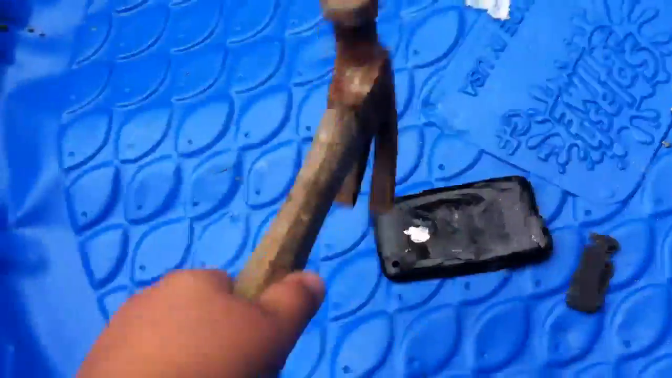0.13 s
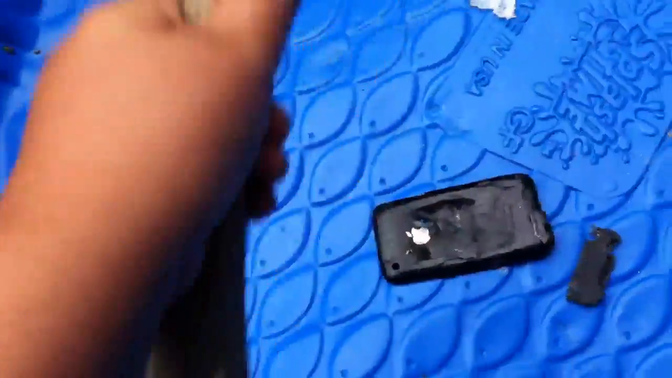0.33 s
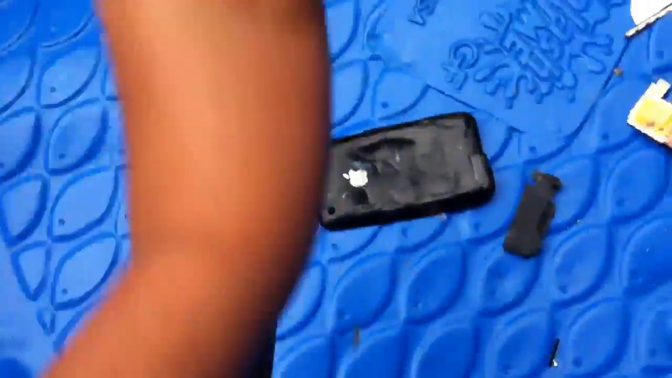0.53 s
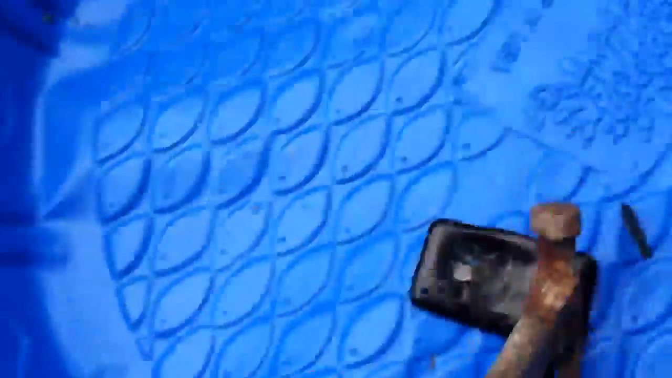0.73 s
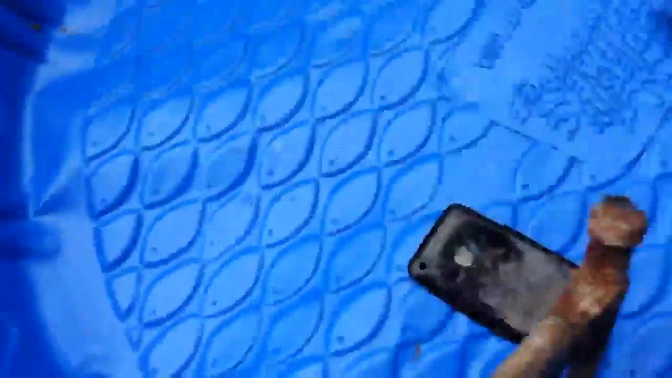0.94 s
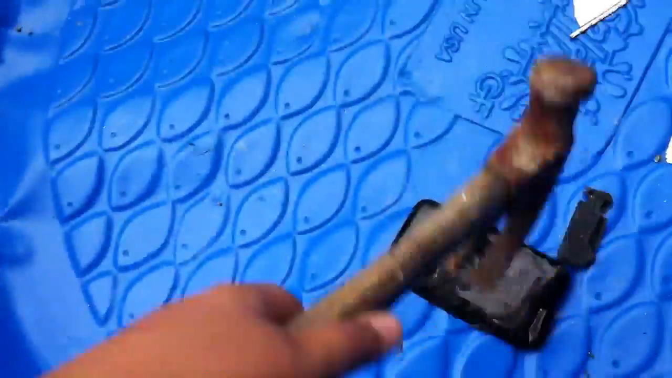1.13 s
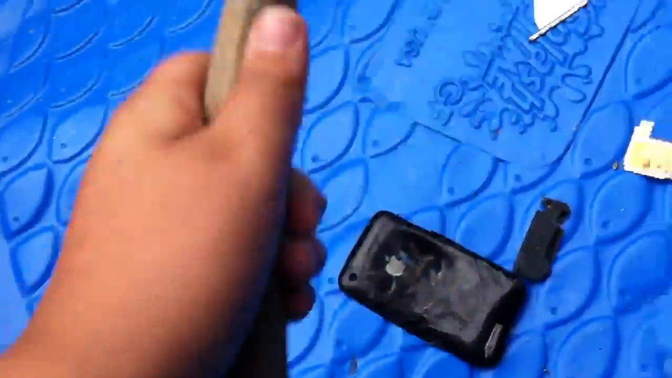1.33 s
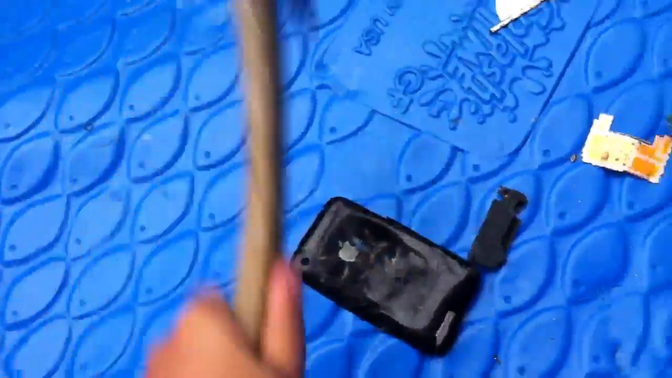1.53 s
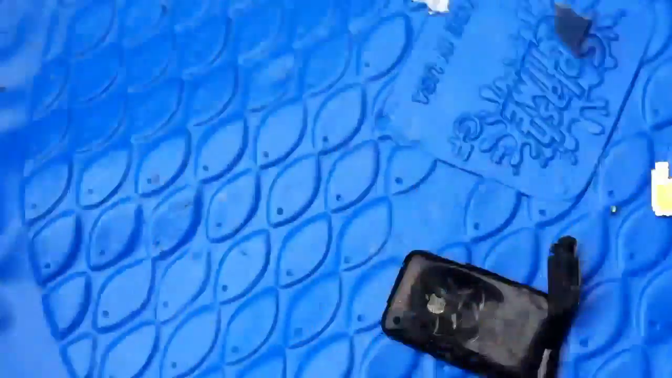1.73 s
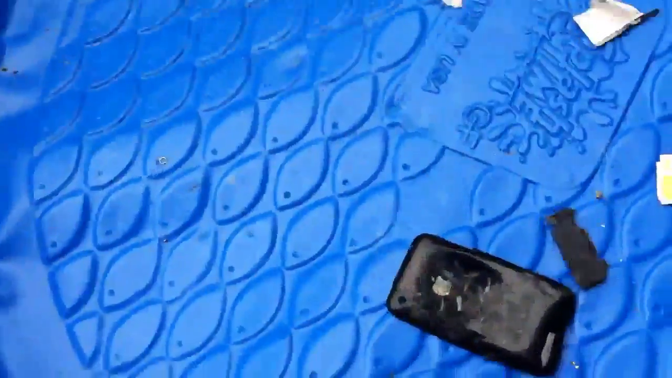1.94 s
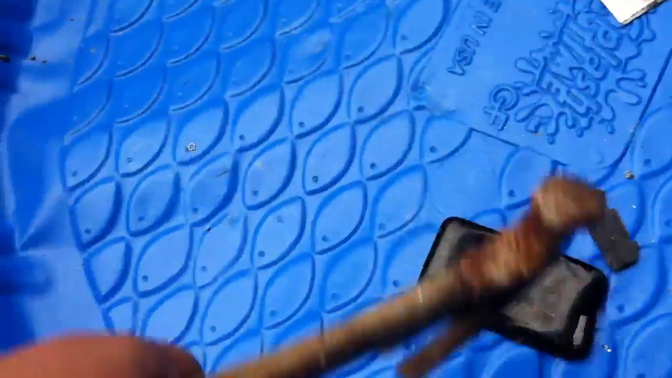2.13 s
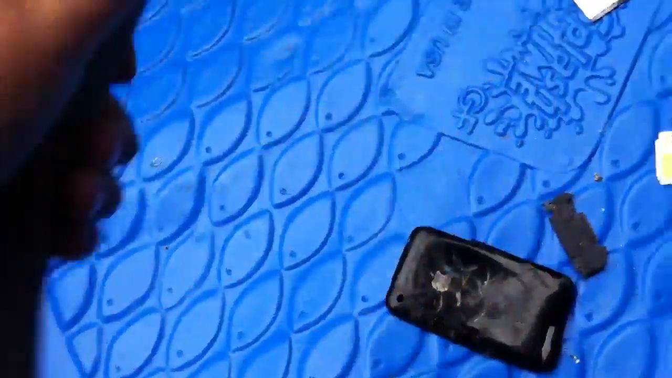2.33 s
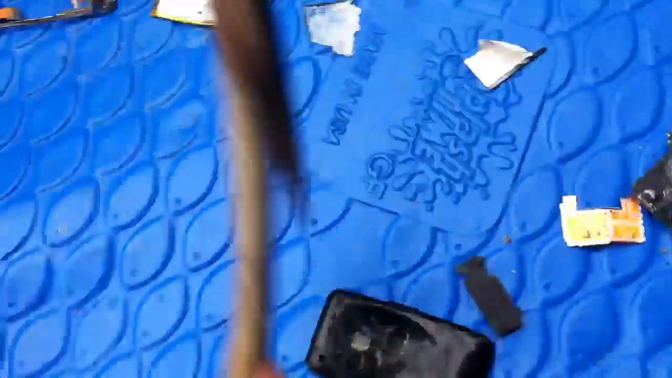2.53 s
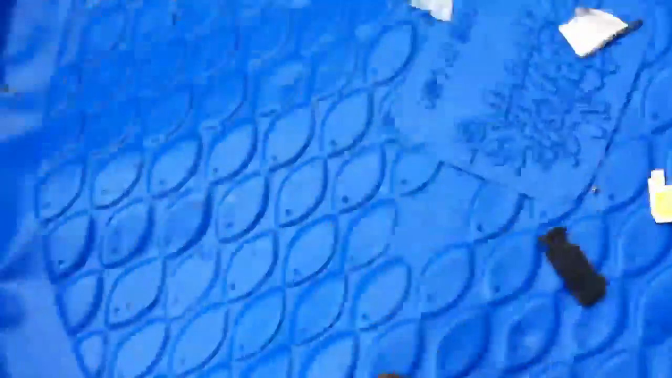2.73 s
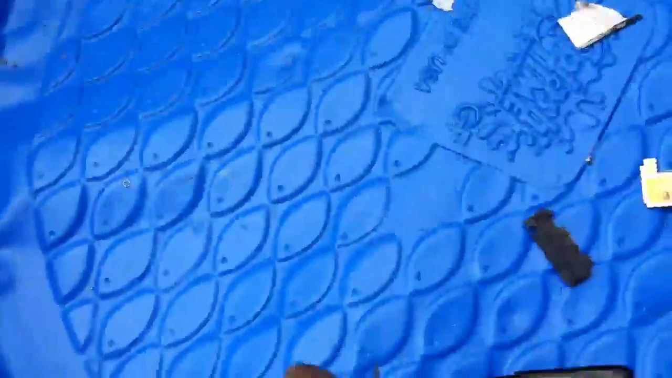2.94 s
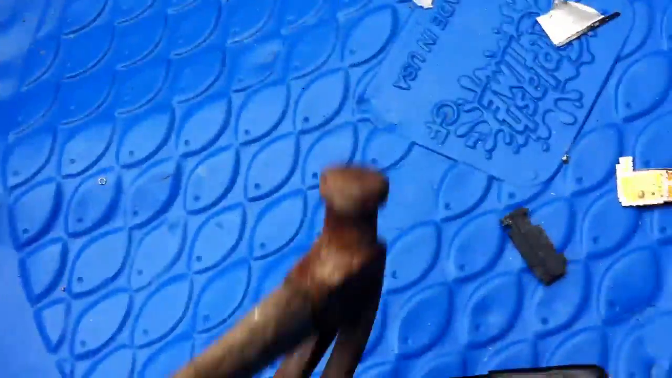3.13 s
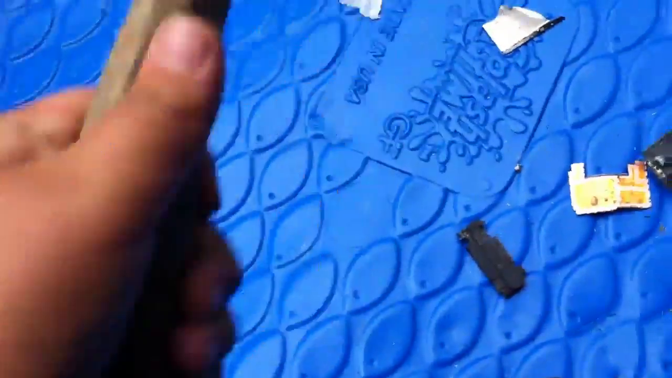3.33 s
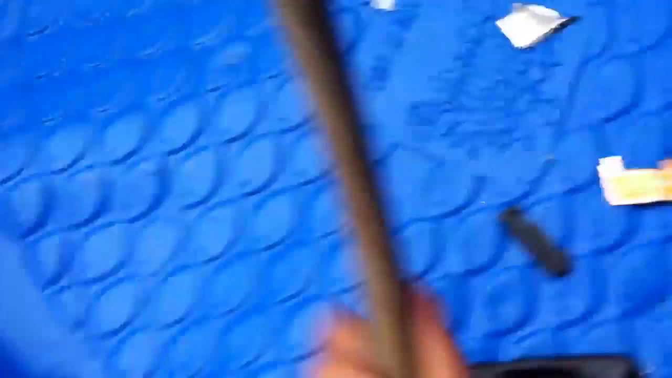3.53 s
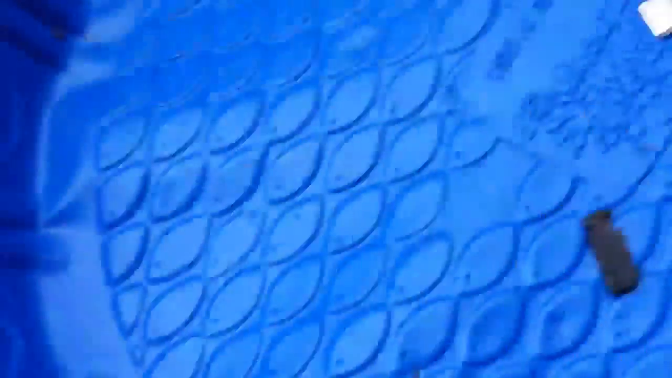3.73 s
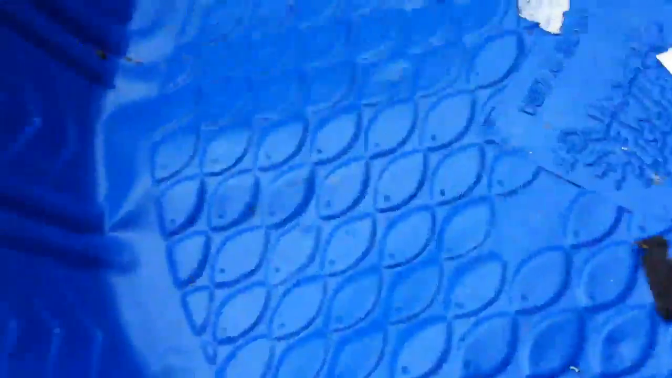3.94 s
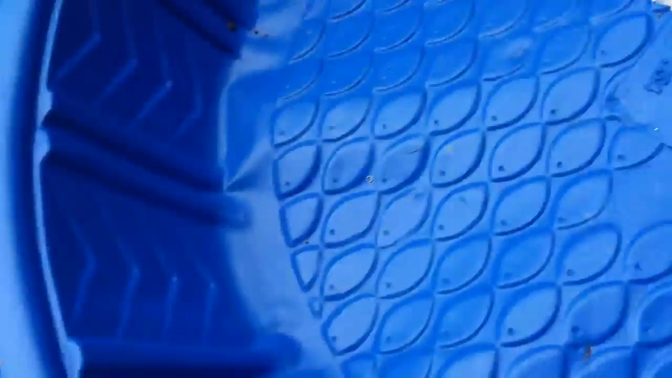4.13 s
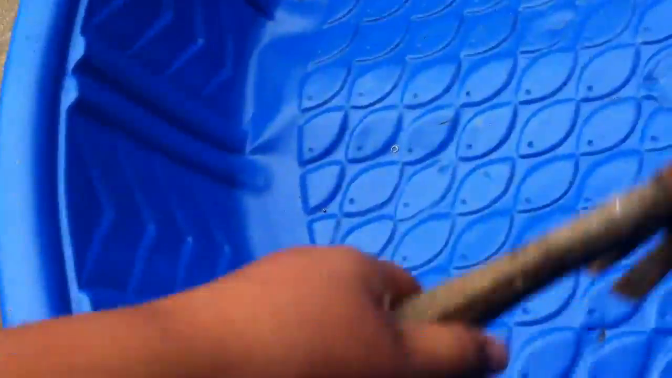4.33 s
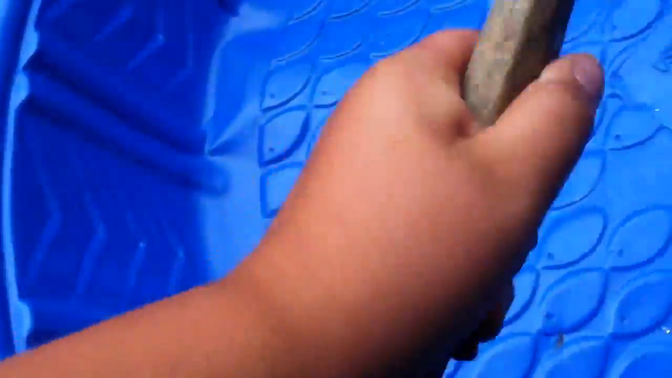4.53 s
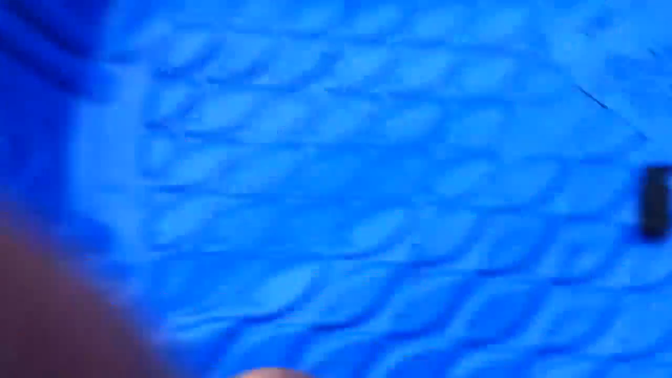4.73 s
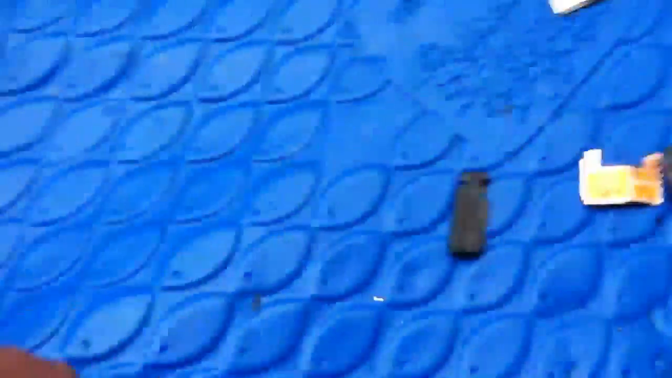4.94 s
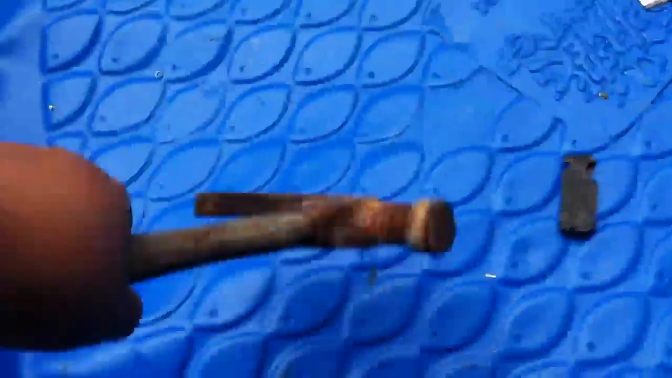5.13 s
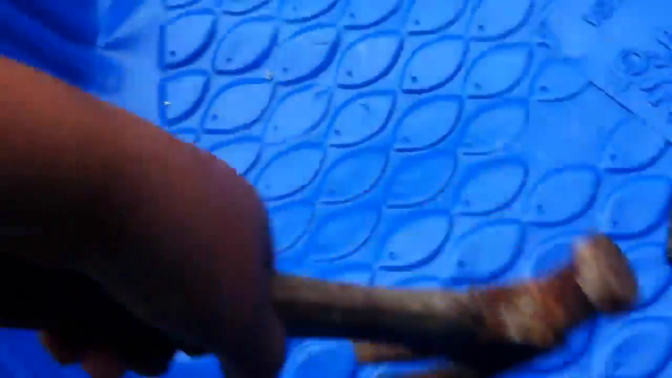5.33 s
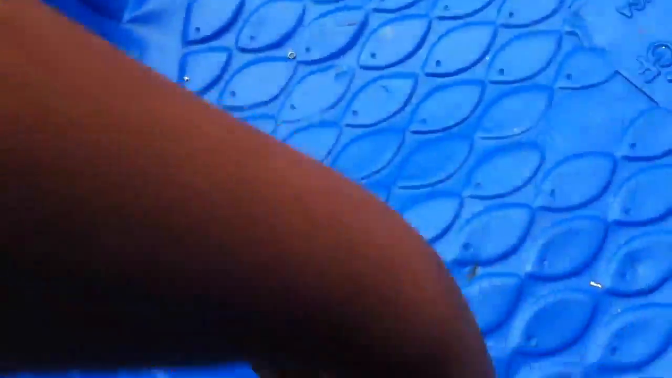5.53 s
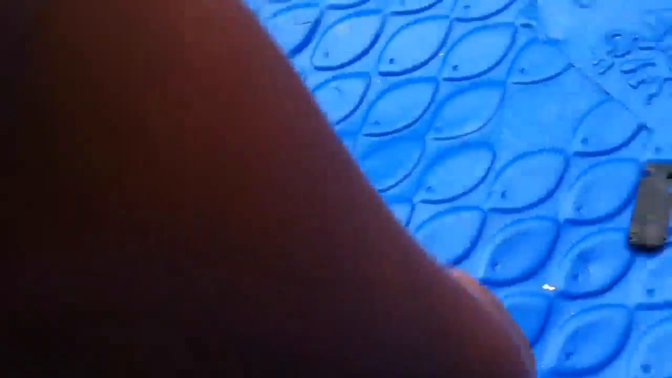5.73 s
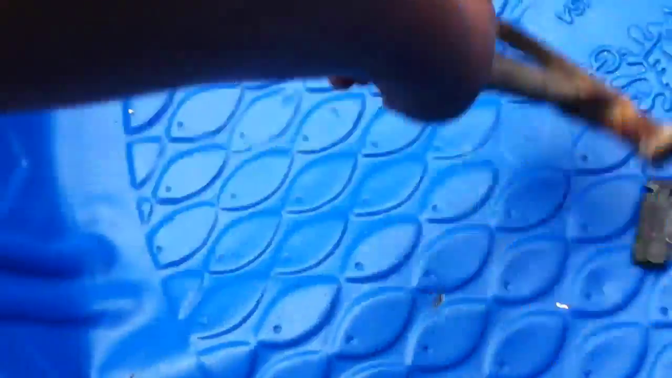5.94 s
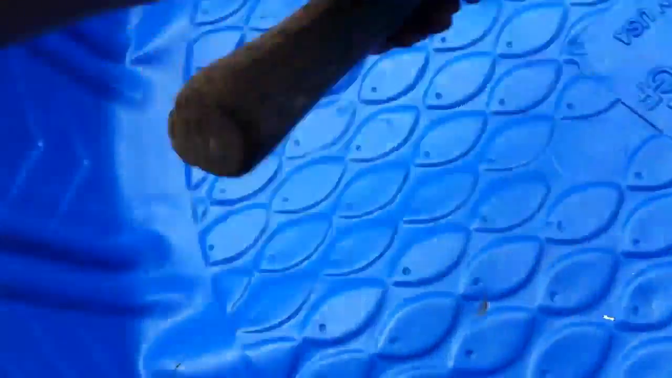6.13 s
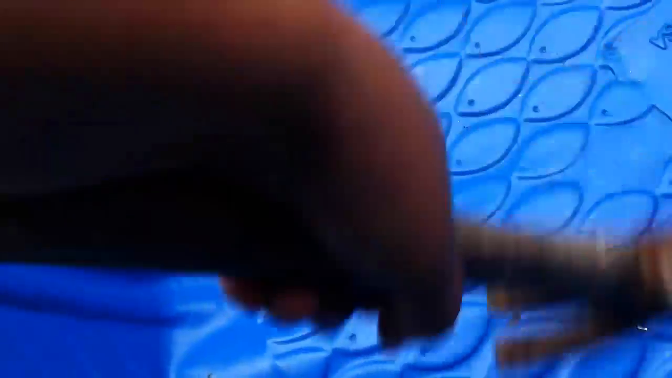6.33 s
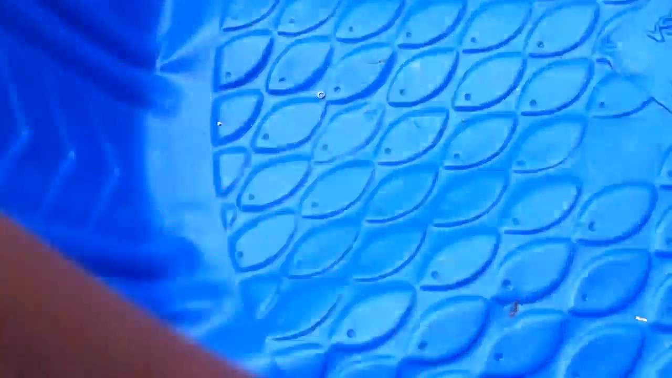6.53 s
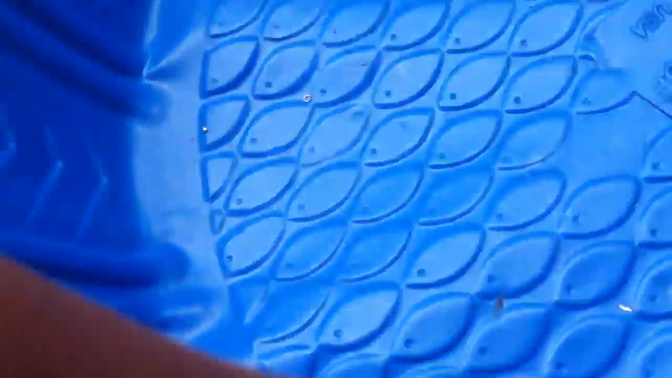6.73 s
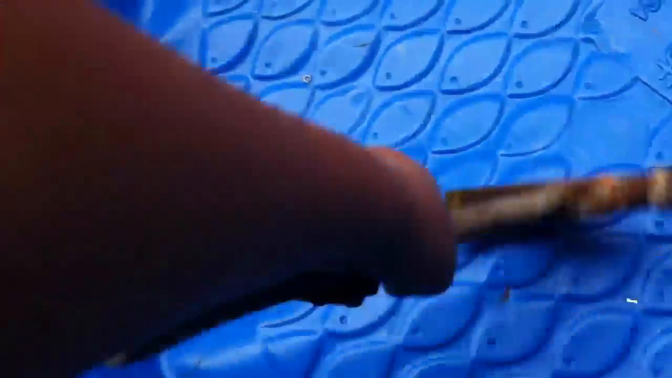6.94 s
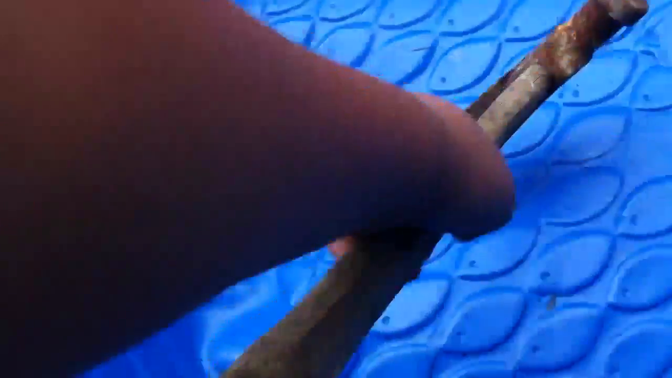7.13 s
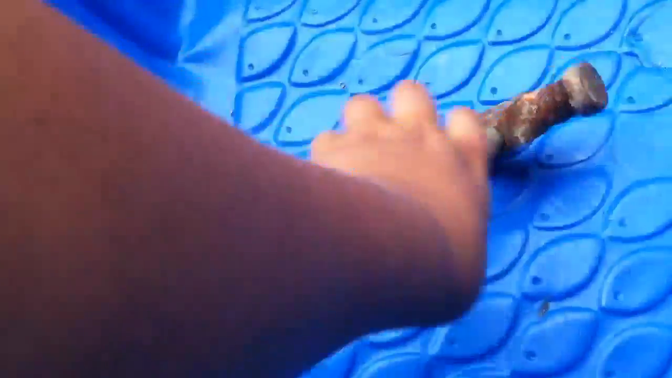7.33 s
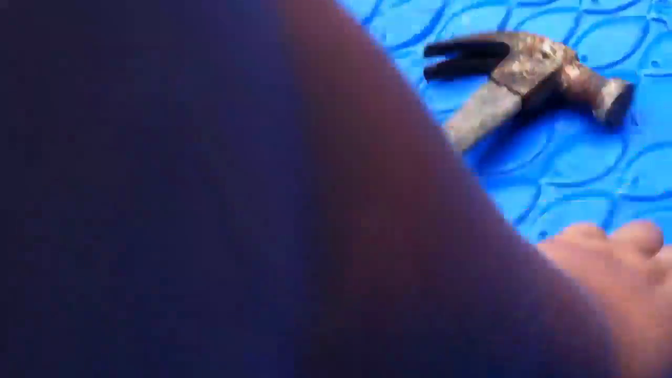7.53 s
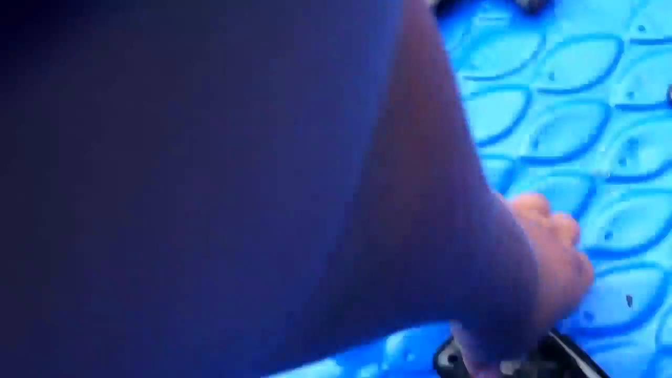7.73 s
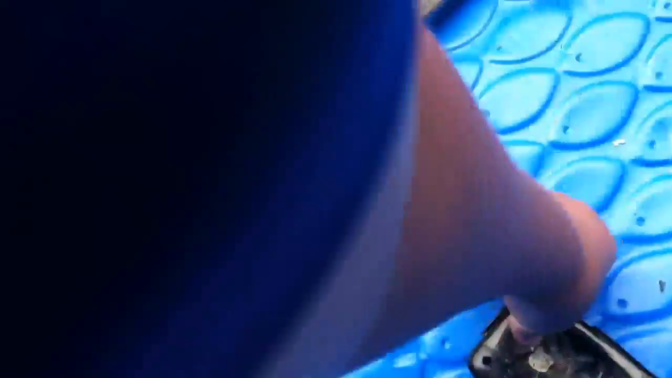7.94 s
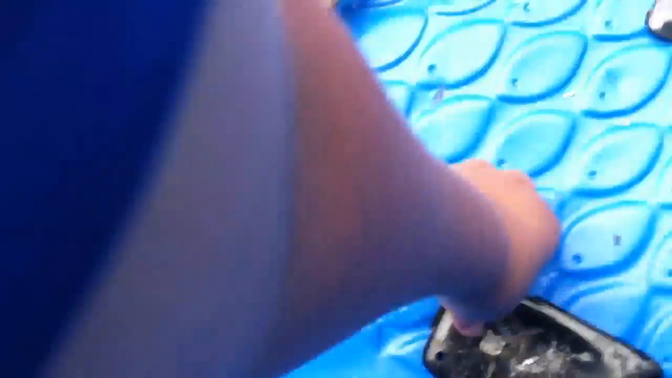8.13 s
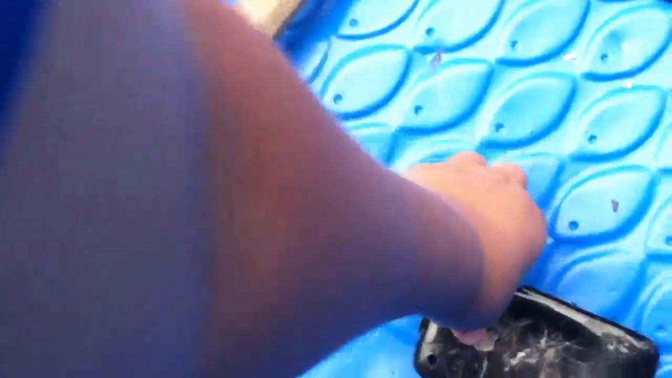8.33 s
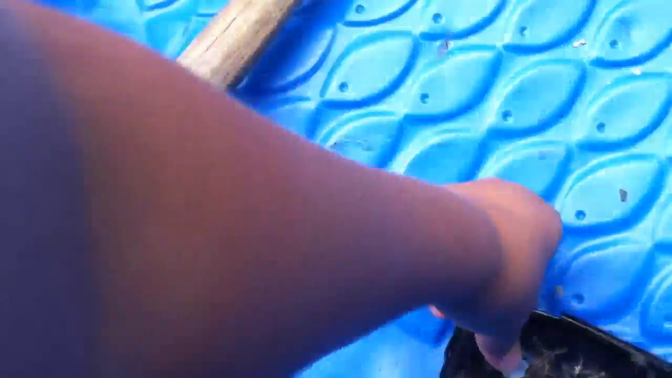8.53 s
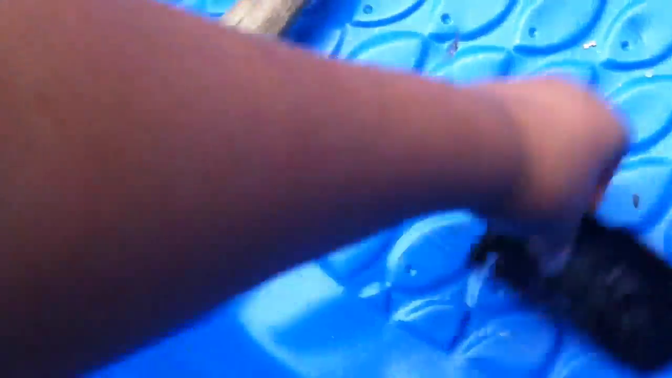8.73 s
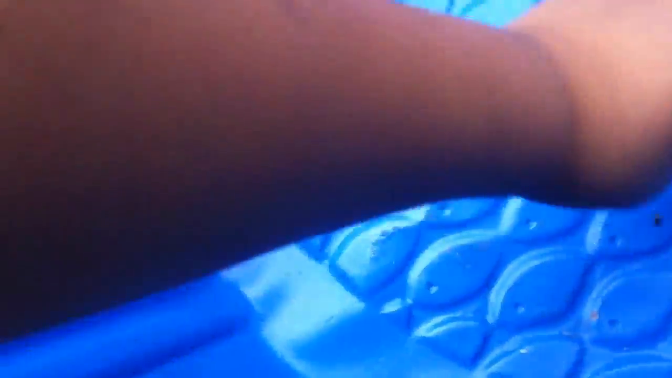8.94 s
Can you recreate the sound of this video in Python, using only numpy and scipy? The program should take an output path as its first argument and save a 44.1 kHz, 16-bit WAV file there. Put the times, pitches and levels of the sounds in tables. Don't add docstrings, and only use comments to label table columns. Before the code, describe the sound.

Five hard blows on a phone casing, roughly one per second, each a loud crack with hollow plastic boom, glass fizz and clattering bits that settle quickly. Then looser bumps and thumps as the hammer tumbles on the ribbed tub, shaking up longer rattles. Fingernail scratches and a thin high squeal come near the end, then one clack. Close microphone, open yard, weak echo, low distant hum.

```python
import sys
import numpy as np
from scipy import signal
from scipy.fft import rfft, irfft, next_fast_len
from scipy.io import wavfile
from scipy.ndimage import uniform_filter1d

SR = 44100
rng = np.random.default_rng(int(sys.argv[2]) if len(sys.argv) > 2 else 0)


def master(y):
    cut = np.clip(np.atleast_2d(y).T, -1, 1)
    pcm = np.round(cut * 32767)
    wavfile.write(sys.argv[1], SR, pcm.astype(np.int16))


def linear_from_db(decibels):
    return 10 ** (np.asarray(decibels, float) / 20)


N = 400898

# (time [s], peak level [dB], boom [dB], glass [dB], time for the crack to fall 60 dB [s])
HAMMER_BLOWS = [(0.754, 2.5, -0.5, -3, 0.12), (1.716, -1, 0.5, -2.5, 0.11), (2.719, 1.5, -3.5, -17.5, 0.14),
                (3.75, 0.5, -18, -9, 0.086), (4.871, 2, -5.5, -26.5, 0.082), (5.852, -20.5, 6, -5.5, 0.12),
                (5.877, -24.5, 6, 0.5, 0.16), (6.724, -6.5, 8.5, -16, 0.042), (6.864, -13.5, -6, 2, 0.2),
                (7.382, -10.5, 15.5, -29, 0.084), (8.892, -23, -1, 2.5, 0.1), (8.922, -29, -26, -12, 0.078)]
# (frequency [Hz], level [dB], time to fall 60 dB [s])
HAMMER_RING = [(1410, -24, .1), (4506, -26, .1), (4893, -11, .1), (4935, -17, .06)]
# (frequency [Hz], level per Hz [dB])
CASING_CRACK = [(290, -29), (500, 2), (841, 2), (1160, -4), (1820, -2.5), (2860, 2), (3930, -11),
                (5000, -17.5), (6500, -39.5), (11000, -120)]
# (frequency [Hz], level per Hz [dB])
CASING_CLATTER = [(350, -29), (600, -7), (760, -2), (862, -5), (954, -6), (2540, -12), (4500, -20),
                  (5850, -52.5), (9900, -120)]
# (frequency [Hz], width [Hz], level [dB])
TUB_FLOOR = [(137, 32, -4), (218, 62, 0), (318.5, 54.6, 2.5), (477, 77, -3.5), (600, 77, -9.5),
             (728, 37, -2.5)]
# (frequency [Hz], level per Hz [dB])
GLASS_FIZZ = [(2240, -4.5), (3800, 3), (4730, 2), (5850, 2), (6680, 3), (7640, 0), (11000, -21.5),
              (14300, -58.5), (22000, -120)]
# (frequency [Hz], level per Hz [dB])
GLASS_EDGE = [(5880, -9.5), (10000, -1.5), (14200, -11), (16000, -13)]
# (time [s], edge level [dB])
GLASS_SHARPNESS = [(0, -22.5), (1.9, -15.5), (2.72, 0), (3.1, 9), (4.1, -0.5), (5.1, -0.5), (5.86, -17),
                   (6.8, -30), (7.4, -43), (9.09, -36)]
# (time [s], peak level [dB], pitch [Hz], time to fall 60 dB [s])
PART_KNOCKS = [(0.154, -18, 613, 0.11), (0.244, -25.5, 572, 0.15), (0.822, -8, 390, 0.063),
               (0.91, -21, 1520, 0.074), (1.16, -42, 604, 0.071), (1.044, -27.5, 526, 0.2),
               (1.219, -37, 4430, 0.083), (1.976, -25.5, 525, 0.16), (2.051, -25.5, 536, 0.046),
               (2.473, -33, 651, 0.033), (2.504, -30, 390, 0.02), (2.663, -25.5, 594, 0.062),
               (2.943, -20.5, 1200, 0.034), (2.992, -25, 700, 0.038), (4.089, -31, 587, 0.074),
               (5.193, -23, 1360, 0.044), (5.208, -22.5, 1360, 0.06), (5.293, -24.5, 1196, 0.043),
               (8.086, -25, 604, 0.046), (8.4, -20.5, 617, 0.093), (8.424, -21, 549, 0.05),
               (8.672, -22, 917, 0.095), (8.847, -21.5, 2850, 0.085), (8.866, -17, 2220, 0.072),
               (8.923, -6.5, 1407, 0.04)]
# (time [s], peak level [dB], pitch [Hz], time to fall 60 dB [s])
RIB_BUMPS = [(5.852, -8.5, 883, 0.063), (5.874, -4.5, 1190, 0.044), (5.918, -13.5, 920, 0.052),
             (5.988, -21, 980, 0.068), (6.021, -16.5, 988, 0.046), (6.046, -25, 410, 0.04),
             (6.066, -19, 447, 0.036), (6.13, -24, 506, .04), (6.943, -16, 620, 0.038),
             (7.464, -20, 1010, 0.04), (7.534, -3.5, 760, 0.02), (7.573, 4, 790, 0.049),
             (7.702, -8, 760, 0.079)]
# (time [s], peak level [dB], pitch [Hz], time to fall 60 dB [s])
CLAW_GRAZES = [
    (2.624, -29, 1534, 0.025),
    (2.657, -6.5, 800, 0.0087),
    (3.74, -2, 890, 0.016),
    (4.794, -25, 500, 0.051),
]
# (time [s], peak level [dB], pitch [Hz], time to fall 60 dB [s])
DENT_POP = [
    (3.671, -14, 489, 0.0087),
]
# (thud level [dB], clatter level [dB])
CONTACT_MIXES = [
    (-11.5, -12.5),
    (-5.5, -41),
    (-9, -29),
    (16, -13),
]
# (time [s], peak level [dB], pitch [Hz])
GLASS_SPLINTERS = [(0.0294, -30, 6920), (0.1237, -21, 8500), (0.153, -32, 5500), (0.2497, -25.5, 7240),
                   (0.388, -34.5, 6400), (0.7553, -4, 6640), (0.8524, -24.5, 6190), (0.8796, -32, 6810),
                   (1.0264, -25.5, 5470), (1.047, -28, 6760), (1.101, -23, 7250), (1.1563, -50, 7580),
                   (1.2181, -31, 5630), (1.249, -40, 7030), (1.716, -8, 7000), (1.8394, -39, 5540),
                   (1.9759, -33, 5500), (2.038, -35, 6620), (2.718, -7, 6000), (2.879, -30.5, 5120),
                   (2.9776, -40, 6380), (3.0671, -43, 6150), (3.1033, -47, 5570), (3.1467, -49, 6200),
                   (3.8212, -31, 5030), (3.8712, -27.5, 6030), (3.923, -36, 8760), (3.9594, -41, 6460),
                   (4.153, -46, 10740), (4.8688, -13, 5700),
                   (3.67, -29, 8300),
                   (5.06, -41.5, 11200), (5.1953, -31, 6900), (5.2195, -35, 7080), (5.3133, -38, 5360),
                   (5.8523, -20, 5400), (5.874, -16, 5030), (5.92, -22, 5180), (5.9873, -23, 5200),
                   (6.726, -14.5, 5200), (6.7595, -25, 7130), (6.7935, -21, 7630), (6.845, -22, 6580),
                   (6.8651, -14, 5010), (6.9391, -30, 5540), (6.9653, -16, 7050), (7.022, -15.5, 6640),
                   (7.0778, -22.5, 7250), (7.141, -24, 6270), (7.383, -16, 5830), (7.4673, -9.5, 5460),
                   (7.5126, -20, 5530), (7.693, -15, 5200), (7.7687, -29, 5700), (7.789, -18, 6360),
                   (7.854, -22, 5300), (8.009, -25.5, 6730), (8.0835, -24, 5050), (8.6724, -37, 5550),
                   (8.8488, -22, 6100), (8.9216, -15, 7100)]
# (start [s], length [s], tub level at the start [dB],
# casing level over the tub [dB], shards level over the tub [dB])
RATTLE_SPELLS = [(0.0, 0.23, -26.5, -3, -10.5), (0.126, 0.2, -45, -14, -15), (0.774, 0.46, -22, -5, -7.5),
                 (1.728, 0.39, -22.5, 0, -10.5), (2.722, 0.37, -24.5, 0.5, -18.5),
                 (3.755, 0.31, -15, -1.5, -23), (4.04, 0.11, -50.5, -6, -22.5), (4.867, 0.27, -34, 2, -17),
                 (5.195, 0.13, -34.5, -0.5, -18.5), (5.868, 0.31, -25, -4, -15), (5.127, 0.02, -49, 8, -10),
                 (5.28, .08, -46, -3, -23), (5.974, 0.26, -31, -4.5, -25), (7.517, 0.7, -17.5, -1.5, -14.5),
                 (7.256, 0.16, -38, -9, -23), (8.504, 0.11, -43.5, 0, -13), (6.728, 0.51, -17, -4, -16),
                 (6.865, 0.8, -23, -1, -17), (7.386, 0.37, -10.5, -2, -16.5),
                 (7.579, .24, -13, -6.5, -20.5), (7.697, 0.45, -17.5, 0, -12.5),
                 (8.1, .63, -46.5, -0.5, -6), (8.921, 0.085, -21.5, -7.5, -17)]
# (time of the catch [s], level [dB])
NAIL_STROKES = [
    (8.23, -40),
    (8.55, -37),
    (8.72, -45),
    (8.799, -28.5),
    (8.83, -30),
]
# (frequency [Hz], width [Hz], level [dB])
NAIL_SQUEAK = [(950, 110, 0), (2050, 300, -10), (2950, 220, 0), (5500, 1500, -15)]
# (time [s], pitch [Hz], level [dB])
SHELL_SQUEAL = [
    (7.95, 4350, -46),
    (8.2, 4120, -45.5),
    (8.251, 4020, -45),
    (8.285, 3840, -32.5),
    (8.296, 3600, -41),
    (8.32, 3490, -43),
    (8.38, 3470, -47),
]
# (frequency [Hz], time to fall 60 dB [s])
YARD_ECHO = [(200, 1), (2000, 0.86), (10000, 0.51)]
# (time [s], level [dB])
HUM_LEVEL = [(0, -49), (.4, -50), (.75, -48.5), (1.3, -50.5), (1.7, -49), (2.15, -50), (2.7, -47.5),
             (3.1, -46.5), (3.7, -46), (4.2, -51), (4.85, -46), (5.45, -46), (5.85, -44), (6.25, -43),
             (6.7, -42.5), (8.9, -42), (9.09, -41)]
# (frequency [Hz], level per Hz [dB])
HUM_COLOUR = [(30, -2), (120, -2), (300, 0), (450, -7), (700, -6), (1600, -8), (2500, -9), (3200, -12),
              (5000, -22), (8000, -31), (10000, -39), (13000, -48), (16000, -55)]

RING_S = 4.872
BLOW_EDGE_DB, SPLINTER_EDGE_DB = -17, 1
FINE_DB_PER_OCTAVE = 12
SETTLE_DB, BEND = -47, 1.205
SWELL_S = 0.01
BURST_DB, BURST_S = 1, 0.02
CASING_FADE_DB, STOP_S = 3, 0.033
DIG_DB_PER_S, LET_GO_DB_PER_S = 392, 450
BLUNT = signal.butter(2, 4500, fs=SR, output="sos")


def unit(x):
    return x / np.sqrt(np.mean(x ** 2) + 1e-20)


def along(points, hz):
    f, value = np.transpose(points)
    return np.interp(np.log(hz + 1), np.log(f + 1), value)


def filtered(x, response):
    size = next_fast_len(len(x) + 8192)
    return irfft(rfft(x, size) * response(np.fft.rfftfreq(size, 1 / SR)), size)[:len(x)]


def modes(table):
    def response(f):
        return sum((-1) ** k * linear_from_db(db) * 1j * f * width / (centre * centre - f * f + 1j * f * width)
                   for k, (centre, width, db) in enumerate(table))
    return response


def tinted(x, spectrum):
    return unit(filtered(x, lambda hz: linear_from_db(along(spectrum, hz))))


def fall(t, t60):
    return linear_from_db(-60 * t / t60)


def place(out, start_s, sound):
    out[round(start_s * SR):][:len(sound)] += sound


def sharpness_db(s):
    return np.interp(s, *np.transpose(GLASS_SHARPNESS))


def blows():
    out, t = np.zeros(N + SR), np.arange(SR // 3) / SR
    for s, db, boom_db, glass_db, t60 in HAMMER_BLOWS:
        shock = rng.standard_normal(len(t))
        casing = tinted(shock, CASING_CRACK) * fall(t, t60)
        glass = tinted(shock, GLASS_FIZZ) * linear_from_db(glass_db)
        glass += tinted(shock, GLASS_EDGE) * linear_from_db(sharpness_db(s) + BLOW_EDGE_DB)
        boom = unit(filtered(shock, modes(TUB_FLOOR))) * linear_from_db(boom_db) * fall(t, 2.19 * t60)
        boom *= 1 - np.exp(-t / 0.015)
        hit = casing + glass * fall(t, 0.88 * t60) + boom
        place(out, s, linear_from_db(db - 6) * hit * (1 - np.exp(-t / 0.0005)))
    ring = sum(linear_from_db(db) * fall(t, t60) * np.sin(2 * np.pi * hz * t) for hz, db, t60 in HAMMER_RING)
    place(out, RING_S, ring * (1 - np.exp(-t / 0.0087)))
    return out[:N]


def knocks():
    out, t = np.zeros(N + SR), np.arange(SR // 8) / SR
    kinds = (PART_KNOCKS, RIB_BUMPS, CLAW_GRAZES, DENT_POP)
    for table, (thud_db, clatter_db) in zip(kinds, CONTACT_MIXES):
        for s, db, hz, t60 in table:
            noise = rng.standard_normal(len(t))
            rough = unit(filtered(noise, modes([(hz, 0.8 * hz, 0)])))
            note = 0.5 * np.sin(2 * np.pi * hz * t) + rough
            floor = 0.5 * unit(filtered(noise, modes(TUB_FLOOR)))
            thud = linear_from_db(thud_db) * (floor + np.sin(2 * np.pi * 310 * t))
            clatter = linear_from_db(clatter_db - 6.5) * tinted(noise, CASING_CLATTER)
            shape = linear_from_db(db - 6) * fall(t, np.clip(t60, 0.005, 0.15)) * (1 - np.exp(-t / 0.0011))
            place(out, s, shape * signal.sosfilt(BLUNT, note + thud + clatter))
    return out[:N]


def splinters():
    out, t = np.zeros(N + SR), np.arange(SR // 40) / SR
    for s, db, hz in GLASS_SPLINTERS:
        noise = rng.standard_normal(len(t))
        edge_db = sharpness_db(s) + SPLINTER_EDGE_DB + FINE_DB_PER_OCTAVE * np.log2(hz / 6000)
        click = tinted(noise, GLASS_FIZZ) + linear_from_db(edge_db) * tinted(noise, GLASS_EDGE)
        click *= fall(t, 0.013) * (1 - np.exp(-t / 0.0007))
        ring = 0.35 * np.sin(2 * np.pi * hz * t) * fall(t, 0.014)
        place(out, s, linear_from_db(db - 1.5) * (click + ring))
    return out[:N]


def contacts(rate, spread_db, life, steady):
    kicks = (rng.random(N) < rate / SR) * linear_from_db(spread_db * rng.exponential(size=N))
    shape = np.exp(-np.arange(SR // 20) / (life * SR))
    return rng.standard_normal(N) * (signal.fftconvolve(kicks, shape)[:N] + steady)


def rattle():
    t, level = np.arange(N) / SR, np.zeros((4, N))
    for s, length, tub_db, casing_db, shards_db in RATTLE_SPELLS:
        now = slice(round(s * SR), round((s + length + STOP_S) * SR))
        age = t[now] - s
        db = SETTLE_DB + (tub_db - SETTLE_DB) * np.clip(1 - age / length, 0, 1) ** BEND
        burst_db = BURST_DB * np.exp(-age / BURST_S)
        gate = np.clip((length - age) / STOP_S + 1, 0, 1)
        tub = linear_from_db(db)
        if s > 0:
            tub = tub * (1 - np.exp(-np.abs(age) / SWELL_S))
        casing = linear_from_db(db + casing_db + burst_db - CASING_FADE_DB * age / length)
        glass = linear_from_db(db + shards_db + burst_db)
        edge = glass * linear_from_db(sharpness_db(s))
        level[:, now] += gate * np.array([tub, casing, glass, edge])
    light = contacts(rate=250, spread_db=-0.5, life=0.0014, steady=0.86)
    heavy = contacts(rate=220, spread_db=-0.5, life=0.006, steady=1.4)
    tub_sound = unit(filtered(heavy, modes(TUB_FLOOR)))
    casing_sound = tinted(heavy, CASING_CLATTER)
    sounds = tub_sound, casing_sound, tinted(light, GLASS_FIZZ), tinted(light, GLASS_EDGE)
    return np.sum(level * sounds, axis=0)


def scratch():
    t, press = np.arange(N) / SR, np.zeros(N)
    for s, db in NAIL_STROKES:
        press += linear_from_db(db - np.maximum(DIG_DB_PER_S * (s - t), LET_GO_DB_PER_S * (t - s)))
    slips = contacts(rate=220, spread_db=0.5, life=0.0012, steady=0.78)
    slips = unit(signal.sosfilt(BLUNT, filtered(slips, modes(NAIL_SQUEAK))))
    at, hz, squeal_db = np.transpose(SHELL_SQUEAL)
    flutter = uniform_filter1d(rng.standard_normal(N), size=150)
    flutter = unit(uniform_filter1d(flutter, size=150))
    pitch = np.interp(t, at, hz) * (1 + 0.045 * flutter)
    squeal = np.sin(2 * np.pi * np.cumsum(pitch) / SR)
    return press * slips + linear_from_db(np.interp(t, at, squeal_db, left=-120, right=-120)) * squeal


def yard(x):
    hz, t, z = signal.stft(rng.standard_normal(SR // 2), SR, nperseg=256)
    tail = signal.istft(z * fall(t, along(YARD_ECHO, hz)[:, None]), SR, nperseg=256)[1]
    late = np.pad(x, (600, 0))
    return signal.fftconvolve(late, tail / np.linalg.norm(tail))[:N]


def hum():
    z = signal.stft(rng.standard_normal(N), nperseg=512)[2]
    patches = uniform_filter1d(rng.standard_normal(z.shape), 6, 0)
    patches = unit(uniform_filter1d(patches, 14, 1))
    noise = signal.istft(z * linear_from_db(1.14 * patches), nperseg=512)[1][:N]
    s, db = np.transpose(HUM_LEVEL)
    return linear_from_db(np.interp(np.arange(N) / SR, s, db)) * tinted(noise, HUM_COLOUR)


def scene():
    near = blows() + knocks()
    echo = linear_from_db(-18) * yard(near)
    return (near + echo + splinters() + rattle() + scratch() + hum())[None]


def roll_off(x):
    return signal.sosfilt(signal.butter(12, 16730, fs=SR, output="sos"), x)


def record(dry):
    x = signal.sosfilt(signal.butter(4, 112, "high", fs=SR, output="sos"), dry)
    x = x / (1 + np.abs(x / 0.95) ** 5) ** (1 / 5)
    x = filtered(x[0], lambda hz: linear_from_db(np.interp(hz, [15600, 16000], [0, -22])))[None]
    return roll_off(x)


dry = scene()
out = record(dry)
master(out)
```